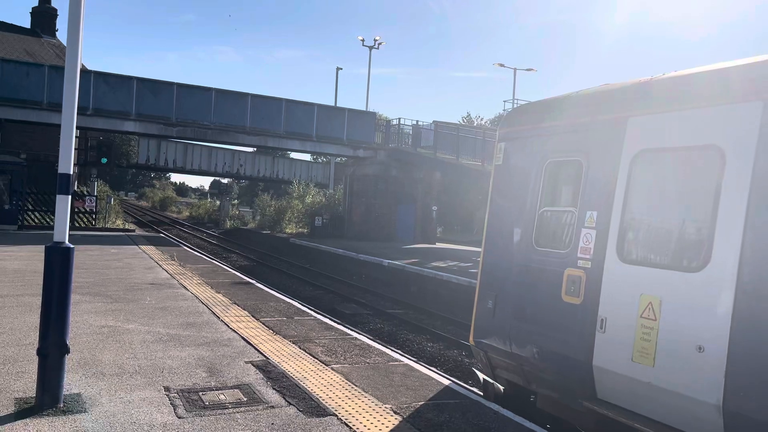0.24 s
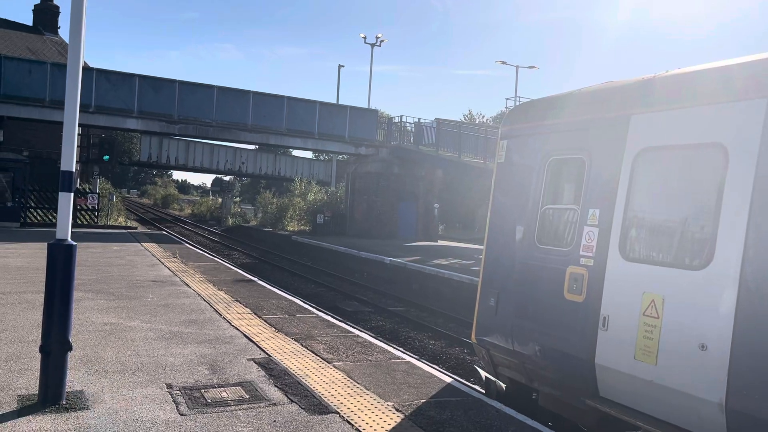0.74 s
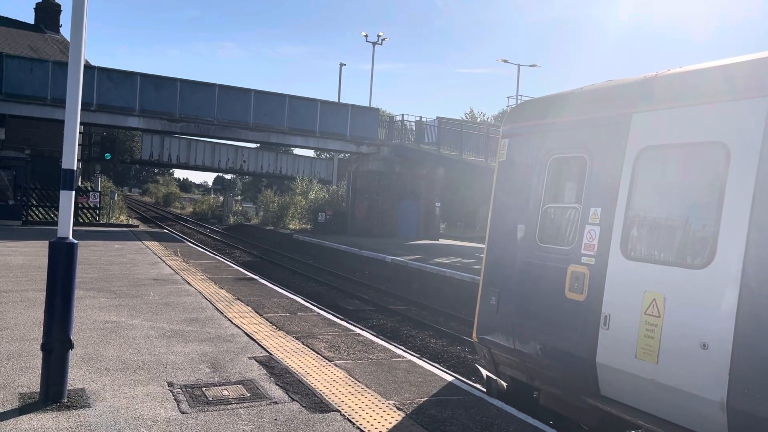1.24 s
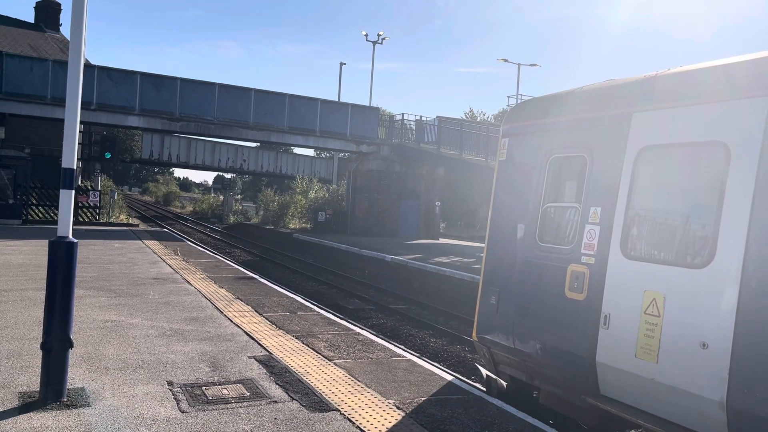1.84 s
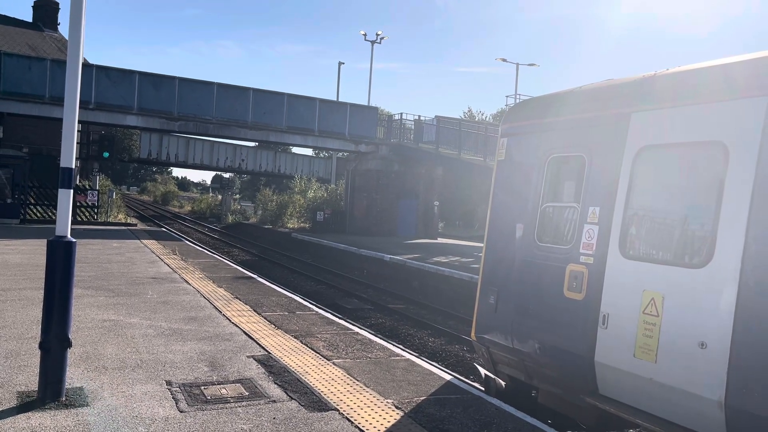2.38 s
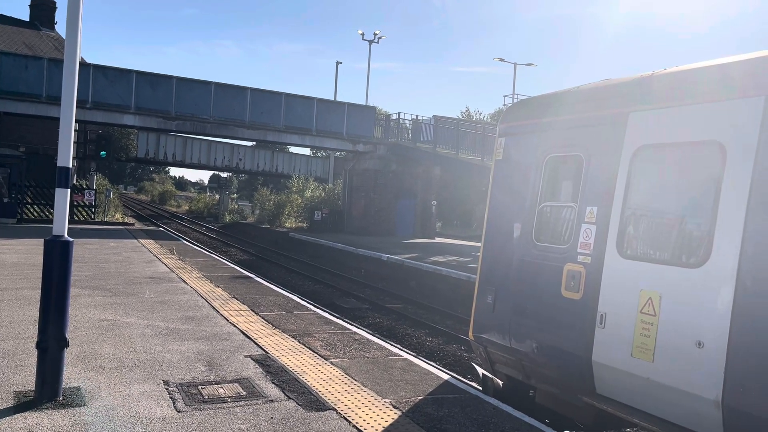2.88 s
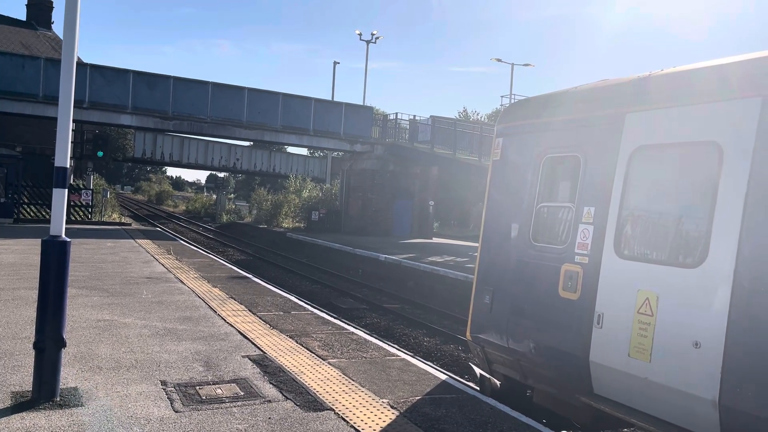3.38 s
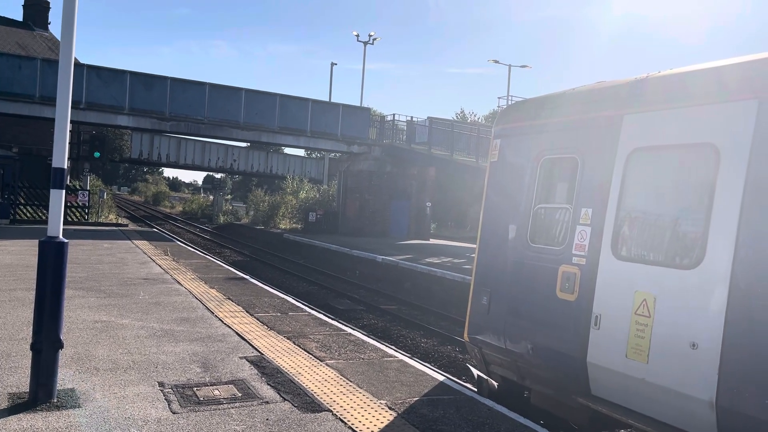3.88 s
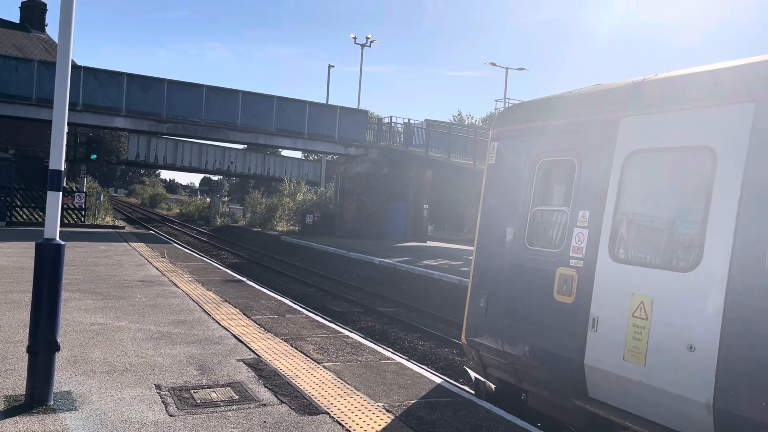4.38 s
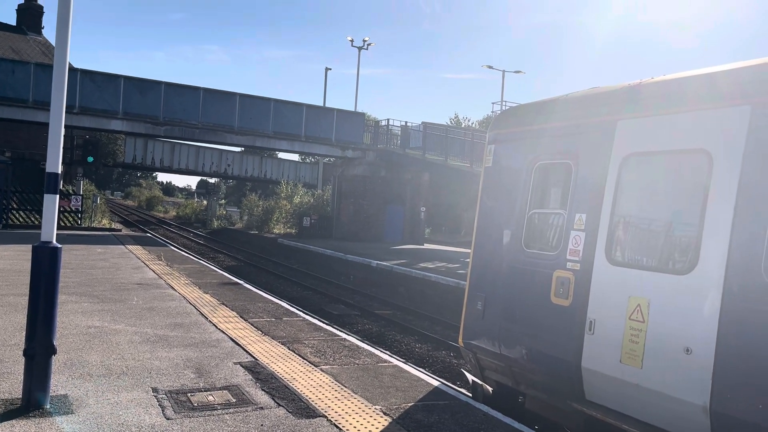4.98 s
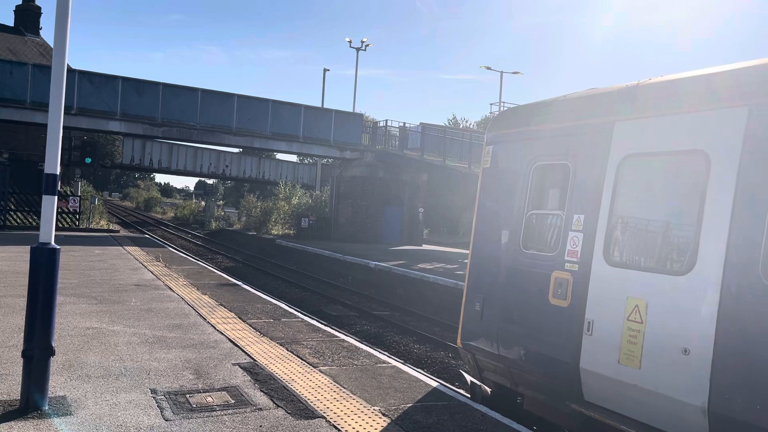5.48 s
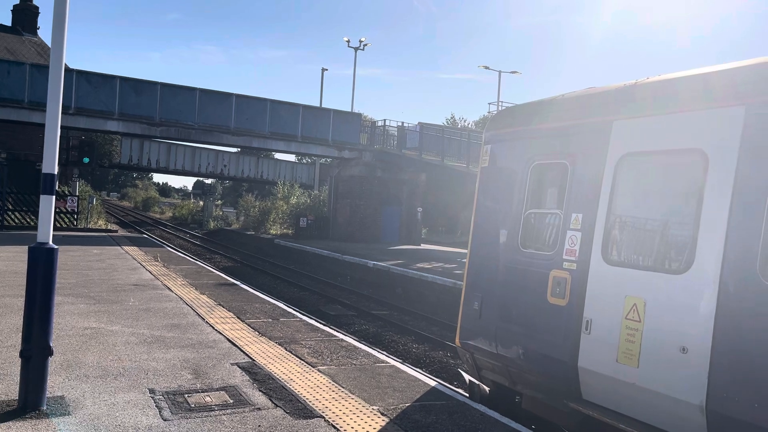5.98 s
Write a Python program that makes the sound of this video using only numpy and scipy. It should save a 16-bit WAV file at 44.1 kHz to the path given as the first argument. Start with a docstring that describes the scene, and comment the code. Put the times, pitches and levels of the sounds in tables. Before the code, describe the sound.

Outdoors on a station platform, close to a diesel railcar, heard in stereo with little echo. From 0 s two engines idle with a deep, uneven throb and soft mechanical clatter, over a steady fan hum. Bright, whistling brake air is already hissing; it holds briefly, then thins out over the first two seconds. Just before 3 s the far engine begins to pick up, and by 3.1 s both are revving. Their firing notes glide upward for about a second and a half, swelling and beating against each other, while a loose metal panel buzzes and knocks from 3.1 to 3.9 s. Air hisses again in steps, strongest near 3.8 s, then slowly fades. From about 4.6 s a full, rough roar with rumble, fan rush and breathy turbo whistle holds, its pitch sagging slightly. A rough machinery whine passes around 5.3-5.6 s. At 6.1 s a high wheel squeal starts abruptly and lasts to the end.

```python
"""Diesel railcar pulling away

Two idling engines throb while air hisses from the brakes; then both rev up and their notes beat together.
A loose panel rattles, the roar sags slightly as the train takes up the load, and a wheel squeals at the end.
Engine notes and squeal are sums of sine waves that follow a moving pitch; roar, air and clatter are
shaped noise; metal parts and pipes are resonances. Two microphone ports hear it all in stereo."""
import sys
import numpy as np
from scipy import signal
from scipy.fft import rfft, irfft, next_fast_len
from scipy.io import wavfile
from scipy.ndimage import uniform_filter1d

SR = 44100
rng = np.random.default_rng(int(sys.argv[2]) if len(sys.argv) > 2 else 0)


def to_wav(sig):
    """Store sig (one row per channel, or 1-D mono) as 16-bit WAV at the path in sys.argv[1].

    Samples outside -1..1 are clipped; the rate is SR.
    """
    pcm = np.clip(np.atleast_2d(sig), -1, 1) * 32767
    pcm = np.round(pcm).astype(np.int16)
    wavfile.write(sys.argv[1], SR, pcm.T)  # frames by channels


N = 274743
TIME = np.arange(N) / SR   # seconds
SIZE = next_fast_len(N + 4096)
FREQS = np.arange(SIZE // 2 + 1) * SR / SIZE   # Hz

# Levels in the tables are before any further gain in the functions.
# One engine cycle is six firings; an "order" is a multiple of the cycle rate.
# Exhaust tones at idle and under load: (order, level [dB])
IDLE_EXHAUST_LINES = [(10, -5), (12, 0), (16, -17)]
LOADED_EXHAUST_LINES = [(3, -40), (4, -48), (6, -48), (7, -42.5), (8, -48), (10, -36.5), (11, -39.5),
                        (13, -42), (14, -36.5), (15, -40), (17, -47.5), (18, -44.5), (20, -38), (21, -44.5),
                        (27, -38), (30, -39), (42, -42), (48, -41)]
# Exhaust tones that drone in the tailpipe: (order, level [dB])
TAILPIPE_DRONES = [(9, -18), (12, -24)]
# Resonances of silencer and tailpipe: (frequency [Hz], width [Hz], level [dB])
SILENCER_MODES = [(173, 16, -4), (157, 14, -8.5), (211, 14, -4)]
# Firing note of each engine, swelling as it crosses its silencer's resonances: (time [s], level [dB])
NEAR_NOTE_LEVELS = [(3.0, -60), (3.18, -28), (3.24, -20), (3.31, -17.5), (3.39, -19), (3.47, -22),
                    (3.53, -16.5), (3.59, -9.5), (3.65, -15), (3.72, -19), (3.79, -29), (3.85, -23),
                    (3.89, -15.5), (3.97, -15.5), (4.06, -18.5), (4.11, -26), (4.17, -22.5), (4.42, -38.5)]
FAR_NOTE_LEVELS = [(2.8, -73.5), (2.92, -39), (3.1, -29), (3.19, -32.5), (3.23, -18.5), (3.39, -21),
                   (3.5, -20), (3.59, -24), (3.66, -17.5), (3.72, -17), (3.81, -20.5), (3.87, -33),
                   (4.2, -45)]
# Harmonics of one firing pulse: (multiple of the firing rate, level [dB])
PULSE_HARMONICS = [(1, -2), (2, -18), (3, -21.5)]
# How the idle throb rises and falls: (time [s], level [dB])
IDLE_THROB_LEVELS = [(0.0, -47), (0.02, -41.5), (0.45, -41), (0.99, -40.5), (1.26, -49), (1.75, -37),
                     (1.86, -54), (2.02, -37), (2.64, -47), (2.65, -60), (2.85, -41), (2.92, -33),
                     (3.02, -38), (3.07, -53)]
# Body panels that sing when an engine tone crosses them: (order, frequency [Hz], width [Hz], level [dB])
BODY_PANELS = [(30, 573, 8, -30), (36, 677, 6.6, -32), (18, 334, 12, -35), (20, 359, 3, -41)]
# Resonances of engine block and underframe: (frequency [Hz], width [Hz], level [dB])
BLOCK_MODES = [(522.4, 11.5, -1), (606, 40, -8), (707, 39, -1), (791, 24, 0), (911, 41, -2), (1010, 30, -9),
               (1127, 52, -6.5), (1543, 82, -5), (1681, 23, -1.5)]
# Extra fuel while the engines pick up: (start [s], attack [s], end [s], release [s])
FUEL_SURGE = (2.72, 1.06, 4.12, 0.21)
# Noise colours of combustion at idle and under load, exhaust rumble, and fan and turbo rush:
# (frequency [Hz], level [dB per Hz])
IDLE_COLOUR = [(18, -82), (32, -72), (65, -84), (110, -67), (190, -65), (290, -68.5), (450, -66),
               (700, -64), (1000, -68), (1300, -73), (2600, -77), (5000, -76.5), (7500, -97.5),
               (14000, -108)]
ROAR_COLOUR = [(80, -71), (170, -57), (260, -56.5), (340, -56.5), (450, -57), (550, -53), (750, -52.5),
               (1000, -55.5), (1300, -60.5), (1750, -56.5), (2500, -73), (5000, -67), (7500, -117),
               (14000, -105)]
RUMBLE_COLOUR = [(22, -90), (33, -93), (50, -43), (85, -45.5), (120, -51), (180, -50.5), (260, -59),
                 (450, -99), (1500, -100)]
RUSH_COLOUR = [(1200, -86), (2100, -59.5), (2600, -62.5), (3200, -61.5), (3700, -60.5), (4150, -59.5),
               (4430, -59), (4750, -59.5), (5350, -59.5), (5900, -66), (6700, -73), (8000, -99),
               (14000, -105)]
# Hard knocks of the loose panel: (time [s], strength [dB])
PANEL_KNOCKS = [(3.151, -22), (3.321, -24), (3.498, -23), (3.666, -21), (3.755, -24), (3.826, -28)]
# Resonances of the loose panel: (frequency [Hz], width [Hz], level [dB])
PANEL_MODES = [(1660, 87, -27), (3510, 370, -7), (3880, 250, -3), (3995, 190, 5.5), (4360, 130, -18)]
# The panel's ring shifts as it is pressed and eased: (time [s], pitch [share of normal])
PANEL_BEND = [(3.07, 0.99), (3.3, 0.98), (3.52, 1.03), (3.68, 1.024), (3.85, .99), (4.1, .97)]
# Brake air let out in steps: (start [s], level [dB], hold [s], decay time [s])
AIR_STEPS = [(-.1, -43, 0.49, 1.2), (3.103, -63, 0.45, 0.55), (3.306, -55.5, 0.61, 0.6),
             (3.815, -45.5, 0.1, 2.96)]
# Noise colour of the air jet: (frequency [Hz], level [dB per Hz])
JET_COLOUR = [(500, -104), (1500, -70), (3000, -68.5), (4500, -67), (6000, -65.5), (7500, -69),
              (8600, -78.5), (9700, -70.5), (12000, -75.5), (13000, -75.5), (14300, -105)]
# Resonances of the air pipe: (frequency [Hz], width [Hz], level [dB])
PIPE_MODES = [(3080, 200, -17), (3700, 53, -10.5), (4280, 94, -9.5), (4580, 60, -5), (4790, 39, -6),
              (5030, 190, -5), (5353, 79, 2.5), (5475, 68, -4.5), (5660, 39, -0.5), (5920, 220, -10.5),
              (6340, 49, -6)]
# Partials of the wheel squeal: (multiple of its pitch, start [s], level [dB])
SQUEAL_LINES = [(1, 6.108, -26.5), (2, 6.12, -32), (4, 6.16, -31)]
# Whines of the machinery: (start [s], end [s], frequency [Hz], width [Hz], level [dB])
MACHINE_WHINES = [(1.475, 3.293, 723, 26, -43), (3.7, 4.12, 357, 35, -37), (5.257, 5.58, 2056, 35.9, -34.5)]
# Resonances of the fan duct: (frequency [Hz], width [Hz], level [dB])
DUCT_MODES = [(721, 31, 0.5), (2247, 36, -4.0), (3013, 200, -6.0)]
# Loudness of the left port over the right: (frequency [Hz], difference [dB])
LEFT_OVER_RIGHT = [(60, 0), (91, .3), (140, 1.5), (210, 1.7), (320, -.5), (490, -3.5), (740, -5),
                   (1120, -4), (1700, -.5), (2580, 2), (3920, 10.5), (5960, 12.5), (8500, 0), (13700, 0)]
# How far the left port leads the right: (frequency [Hz], phase [radians])
LEFT_LEAD = [(0, 0), (70, -.15), (170, -.8), (300, -2.1), (600, -3.2), (1600, -3.0), (1750, -4.6),
             (2450, -4.5), (2700, -5.3), (3450, -5.8), (3700, -7.9), (4570, -9.4), (6370, -14.3),
             (7670, -21.7), (9560, -23), (11000, -24.6), (14000, -25.3)]
# How alike the two ports sound: (frequency [Hz], likeness [0 to 1])
PORT_LIKENESS = [(70, 1), (150, 0.95), (300, 0.87), (700, 0.85), (1400, 0.44), (2300, 0.92), (3500, 0.54),
                 (4200, 1), (5500, 0.5), (7000, 0.12), (8500, 1), (12000, 0.87)]

# Engine speed, in firings per second; the far engine starts first and runs a little slower at the top
IDLE_HZ, NEAR_TOP_HZ, FAR_TOP_HZ, CLIMB_HZ_PER_S = 37.4, 114.6, 112.3, 53
REV_S, FAR_LEAD_S, TOP_HOLD_S, FLYWHEEL_S = 3.115, .27, .25, 0.158
SAG_HZ, SAG_S = 11, .9
FAR_EXHAUST_DB = -9
IN_STEP_S = 3.587   # the two beating notes are in step at this moment
# Load comes on as the throttle opens and grows with a power of speed
THROTTLE_S, THROTTLE_ATTACK_S, LOAD_POWER, IDLE_LOAD_DB = 3.035, 0.072, 0.7, -50
# Beat of the firing notes at idle
IDLE_FIRING_DB, BEAT_HZ, BEAT_LULL_S, BEAT_DEPTH = -43.5, 0.72, 0.63, 0.66
# Exhaust rumble: a steady part, a part that follows the load and a part that follows the surge
RUMBLE_IDLE_DB, RUMBLE_LOAD_DB, RUMBLE_SURGE_DB = -22.5, -13.5, -5.5
# Breathy turbo whistle, which follows a power of speed
TURBO_HZ, TURBO_WIDTH_HZ, TURBO_DB, TURBO_POWER = 4385, 82, -37, 24
# The panel buzzes under load until the firing rate outruns it
BUZZ_DB, BUZZ_STOP_HZ, BUZZ_STOP_STEEPNESS = -24, 96, 13
BUZZ_WANDER, PIPE_WANDER, BLOCK_WANDER = .008, .004, .012   # shares of their pitch
VALVE_OPENS_S, PIPE_FADE_DB_PER_S = 0.029, 0.16
# The squeal starts a little sharp and settles on its pitch
SQUEAL_HZ, SQUEAL_SHARP_HZ, SQUEAL_SETTLE_S, SQUEAL_ATTACK_S = 1026, 39.4, 0.041, 0.015
CUTOFF_HZ = 14300


def engine_speed(start, top_hz):
    """Firings per second: idle, even climb, short hold, sag under load; the flywheel rounds the corners."""
    top_s = start + (top_hz - IDLE_HZ) / CLIMB_HZ_PER_S
    sag = SAG_HZ * (1 - np.exp(-np.maximum(TIME - top_s - TOP_HOLD_S, 0) / SAG_S))
    speed = np.interp(TIME, [start, top_s], [IDLE_HZ, top_hz]) - sag
    return uniform_filter1d(speed, int(FLYWHEEL_S * SR), mode="nearest")


def firing_note(firing, levels):
    """Each firing gives one firm, rounded pulse, so the note glides with engine speed."""
    firings = np.cumsum(firing) / SR
    angle = 2 * np.pi * (firings - np.interp(IN_STEP_S, TIME, firings))
    pulses = sum(from_db(db) * np.exp(1j * k * angle) for k, db in PULSE_HARMONICS)
    level = from_db(np.interp(TIME, *np.transpose(levels)))
    return np.sqrt(2) * level * np.array([pulses.real, pulses.imag])


def exhaust(firing, load):
    """Six unequal cylinders give tones at multiples of the cycle rate; some swell in the silencer."""
    cycle_hz = firing / 6
    cycles = np.cumsum(cycle_hz) / SR
    lines = sum(from_db(db) * tone(k * cycles, rough=0.31, rate=2.3) for k, db in LOADED_EXHAUST_LINES)
    drone = 0
    for k, db in TAILPIPE_DRONES:
        swell = resonances(SILENCER_MODES, k * cycle_hz)
        drone = drone + from_db(db) * swell * tone(k * cycles, rough=0.12, rate=2.5)
    return load * (drone + (firing / firing.max()) ** 3.3 * lines)


def body(firing, load):
    """Each body panel swells while its engine tone passes through its resonance."""
    cycle_hz = firing / 6
    cycles = np.cumsum(cycle_hz) / SR
    singing = 0
    for k, hz, width, db in BODY_PANELS:
        swell = resonances([(hz, width, db)], k * cycle_hz)
        singing = singing + swell * tone(k * cycles, rough=.15, rate=3.6)
    return load * singing


def idle(firing, load):
    """At idle the exhausts throb unevenly and their firing notes beat slowly; load fades this out."""
    firings = np.cumsum(firing) / SR
    cycles = firings / 6
    lines = sum(from_db(db) * tone(k * cycles, rough=0.39, rate=3.4) for k, db in IDLE_EXHAUST_LINES)
    lull = np.cos(np.pi * BEAT_HZ * (TIME - BEAT_LULL_S)) ** 2
    beat = from_db(IDLE_FIRING_DB) * (1 - BEAT_DEPTH * lull)
    throb = from_db(np.interp(TIME, *np.transpose(IDLE_THROB_LEVELS)))
    return np.clip(1 - load, 0, 1) * (beat * tone(firings, rough=0.09, rate=2.5) + throb * lines)


def engine_noise(firing, load, speed, surge):
    """Combustion noise and clatter grow with load; fan and turbo rush grow with speed as well."""
    steady_ring = from_db(-45.5) * ringing(BLOCK_MODES)
    knocking = bent(clatter(firing), 1 + BLOCK_WANDER * drift(3.985))
    block = steady_ring + knocking * (from_db(-48.0) + from_db(-27.5) * load)
    roar = load * coloured(ROAR_COLOUR) * from_db(0.79 * drift(4.5))
    combustion = from_db(-0.14) * coloured(IDLE_COLOUR) + roar
    rush = load * speed * coloured(RUSH_COLOUR) * from_db(0.92 * drift(7.5))
    rumble = from_db(RUMBLE_IDLE_DB) + from_db(RUMBLE_LOAD_DB) * load + from_db(RUMBLE_SURGE_DB) * surge
    turbo = from_db(TURBO_DB) * speed ** TURBO_POWER * ringing([(TURBO_HZ, TURBO_WIDTH_HZ, 0)])
    return combustion + block + rush + turbo + rumble * coloured(RUMBLE_COLOUR)


def clatter(firing, size=1024):
    """Valves, injectors and gears repeat one dense pattern of knocks every cycle and ring the block."""
    place = np.cumsum(firing) / SR / 6 * size   # position in the repeating pattern
    patterns = rng.standard_normal((2, size))
    knocks = np.array([np.interp(place, np.arange(size), pattern, period=size) for pattern in patterns])
    return rms_one(irfft(rfft(knocks, SIZE) * resonances(BLOCK_MODES), SIZE)[:, :N])


def panel(firing, load):
    """Shaken at low engine speeds, a loose panel buzzes; each hard knock is a flurry of contacts."""
    buzz = load * from_db(BUZZ_DB + 1.44 * drift(27))
    shake = buzz / (1 + (firing / BUZZ_STOP_HZ) ** BUZZ_STOP_STEEPNESS)
    for start, db in PANEL_KNOCKS:
        age = np.maximum(TIME - start, 0)
        shake = shake + from_db(db) * (1 - np.exp(-age / 0.0013)) * np.exp(-age / 0.011)
    pitch = np.interp(TIME, *np.transpose(PANEL_BEND)) + BUZZ_WANDER * drift(14)
    return shake * bent(ringing(PANEL_MODES), pitch)


def brake_air():
    """Each step opens, holds and drains; as pressure falls the jet fades much faster than the pipe's whistle."""
    power = 0
    for start, db, hold, decay in AIR_STEPS:
        power = power + (from_db(db) * envelope(start, VALVE_OPENS_S, start + hold, decay)) ** 2
    pressure_db = 10 * np.log10(power + 1e-18) + 41
    jet = from_db(pressure_db + 1.1 * drift(15)) * coloured(JET_COLOUR)
    whistle_db = 0.48 * pressure_db - 27.5 - PIPE_FADE_DB_PER_S * TIME
    whistle = bent(ringing(PIPE_MODES), 1 + PIPE_WANDER * drift(5))
    return jet + from_db(whistle_db) * whistle


def wheel_squeal():
    """A wheel slips on the rail and sings at once; its upper partials break in one after another."""
    age = np.maximum(TIME - SQUEAL_LINES[0][1], 0)
    turns = np.cumsum(SQUEAL_HZ + SQUEAL_SHARP_HZ * np.exp(-age / SQUEAL_SETTLE_S)) / SR
    squeal = 0
    for k, start, db in SQUEAL_LINES:
        rise = np.clip((TIME - start) / SQUEAL_ATTACK_S, 0, 1)
        squeal = squeal + from_db(db) * rise * tone(k * turns, rough=.25, rate=30)
    return squeal


def whines():
    """Parts of the machinery sing for a while: narrow bands of noise, so they sound rough and broken."""
    total = 0
    for start, end, hz, width, db in MACHINE_WHINES:
        level = from_db(db) * envelope(start, attack=0.048, end=end, release=0.093)
        total = total + level * ringing([(hz, width, 0)])
    return total


def cooling_fan():
    """A fan under the floor hums at a steady speed, and its draught rings the duct."""
    hum = tone(215.5 * TIME, rough=.18, rate=2)   # 215.5 Hz
    return from_db(-43.0) * hum + from_db(-43.5) * ringing(DUCT_MODES)


def microphones(x):
    """Direct and scattered sound reach two ports with different shading and delay."""
    direct, scattered = rfft(x, SIZE)
    alike = np.clip(over_hz(PORT_LIKENESS), 0, 1)
    sides = np.array([[1], [-1]])   # left, right
    pair = np.sqrt((1 + alike) / 2) * direct + sides * np.sqrt((1 - alike) / 2) * scattered
    shade = from_db(sides * over_hz(LEFT_OVER_RIGHT) / 2)
    pair = pair * shade / np.sqrt(np.mean(shade ** 2, axis=0))   # keeps the total power
    lead = np.exp(1j * np.interp(FREQS, *np.transpose(LEFT_LEAD)))
    return irfft(np.array([pair[0] * lead, pair[1]]), SIZE)[:, :N]


def tone(turns, rough, rate):
    """A sine that wanders in strength and phase; direct and scattered copies start at phases of their own."""
    angle = 2 * np.pi * (turns + rng.random((2, 1))) + rough * drift(rate)
    return np.sqrt(2) * (1 + rough * drift(rate)) * np.sin(angle)


def ringing(modes):
    """Resonances kept ringing by turbulence or dense contacts; rms 1."""
    return rms_one(noise(resonances(modes)))


def resonances(modes, at=FREQS):
    """Gain of a set of resonances at every frequency, or along a moving pitch."""
    power = 0
    for hz, width, db in modes:
        power = power + from_db(db) ** 2 / (1 + (2 * (at - hz) / width) ** 2 / 2) ** 2
    return np.sqrt(power)


def bent(pair, pitch):
    """Bends the pitch of a ringing sound by playing it faster or slower."""
    return np.array([np.interp(np.cumsum(pitch) % N, np.arange(N), ring) for ring in pair])


def coloured(spectrum):
    """Noise with the colour of a spectrum table."""
    return noise(from_db(over_hz(spectrum)))


def noise(gain):
    """Two unrelated noises (direct and scattered sound) with the given amplitude per root Hz."""
    white = rng.standard_normal((2, SIZE))
    return irfft(rfft(white) * gain, SIZE)[:, :N] * np.sqrt(SR / 2)


def over_hz(points):
    """A table read at every frequency, joined on a log axis."""
    hz, value = np.transpose(points)
    return np.interp(np.log(FREQS + 1), np.log(hz + 1), value)


def drift(rate):
    """Slow random wandering of rms 1, from smoothed noise at one value per 100 samples."""
    r = np.exp(-200 * np.pi * rate / SR)
    white = rng.standard_normal(N // 100 + 1002)
    slow = signal.lfilter([1], [1, -2 * r, r * r], white)[1000:]   # drops the filter's start-up
    return np.interp(np.arange(N) / 100, np.arange(len(slow)), rms_one(slow))


def envelope(start, attack, end, release):
    """Rises evenly, holds until the end, then dies away."""
    return np.clip((TIME - start) / attack, 0, 1) * np.exp(-np.maximum(TIME - end, 0) / release)


def rms_one(x):
    """Scales a sound to rms 1."""
    return x / np.sqrt(np.mean(x ** 2) + 1e-20)


def from_db(db):
    """Turns decibels into an amplitude factor."""
    return 10 ** (np.asarray(db) / 20)


def scene():
    """Both engines share one throttle; all sources are heard through the two ports."""
    near = engine_speed(REV_S, NEAR_TOP_HZ)
    far = engine_speed(REV_S - FAR_LEAD_S, FAR_TOP_HZ)
    firing = (near + far) / 2
    speed = firing / firing.max()
    throttle = np.clip((TIME - THROTTLE_S) / THROTTLE_ATTACK_S, 0, 1)
    load = from_db(IDLE_LOAD_DB) + throttle * speed ** LOAD_POWER
    surge = envelope(*FUEL_SURGE)
    near_engine = firing_note(near, NEAR_NOTE_LEVELS) + exhaust(near, load) + body(near, load)
    far_engine = firing_note(far, FAR_NOTE_LEVELS) + from_db(FAR_EXHAUST_DB) * exhaust(far, load)
    engines = near_engine + far_engine + idle(firing, load) + engine_noise(firing, load, speed, surge)
    others = panel(firing, load) + brake_air() + whines() + cooling_fan()
    squeal = wheel_squeal()[0]   # reaches both ports alike
    return microphones(engines + others) + squeal


def record(dry):
    """Cuts the top of the treble steeply."""
    lowpass = signal.ellip(10, .2, 80, CUTOFF_HZ, fs=SR, output="sos")
    return signal.sosfilt(lowpass, dry)


dry = scene()
out = record(dry)
to_wav(out)
```